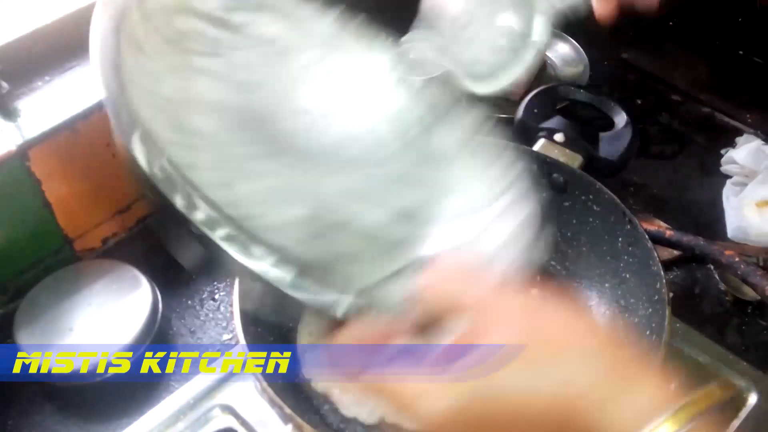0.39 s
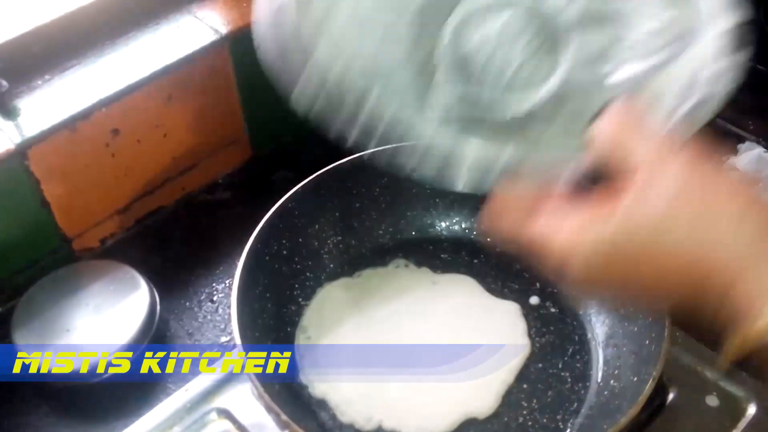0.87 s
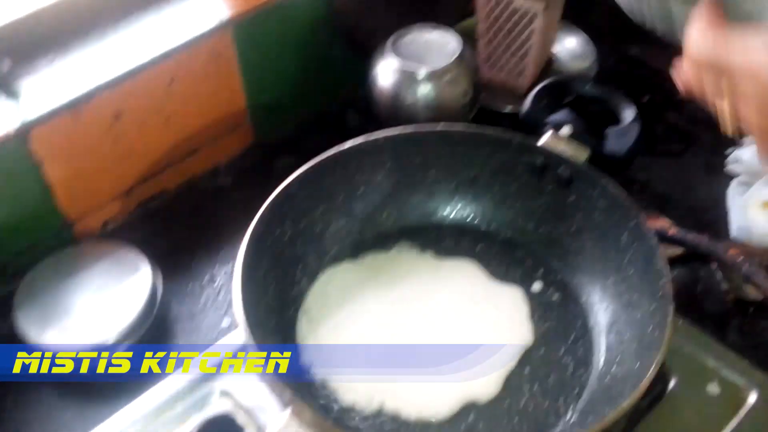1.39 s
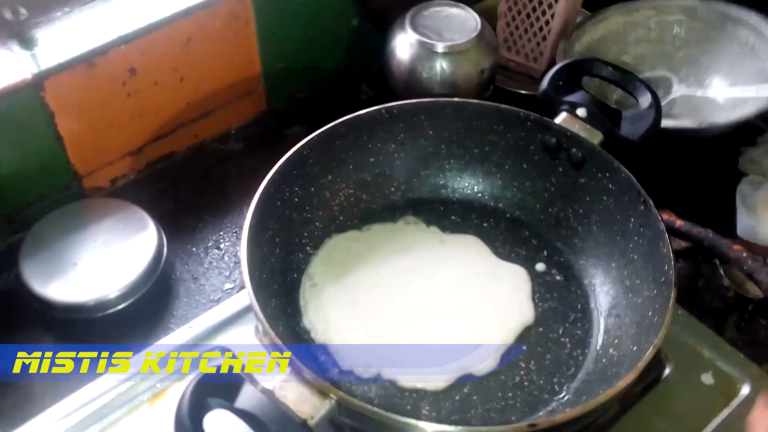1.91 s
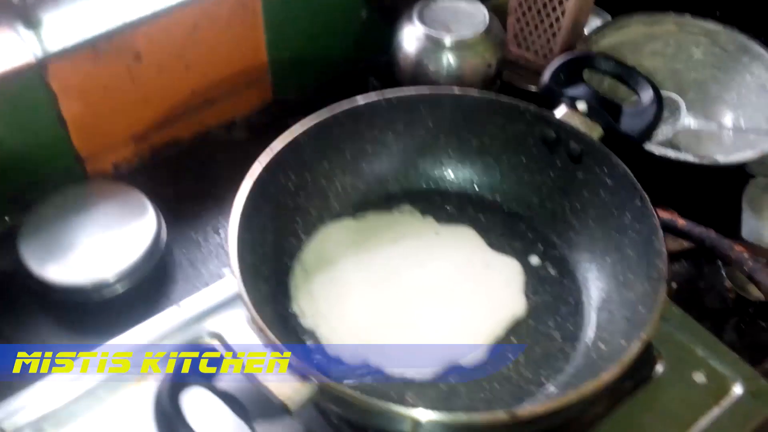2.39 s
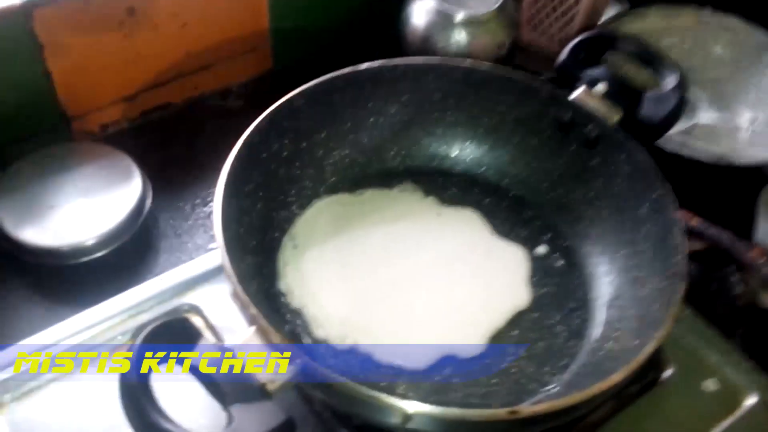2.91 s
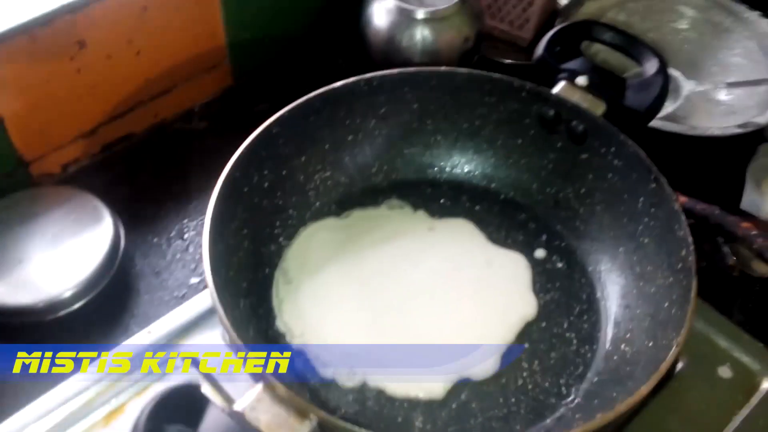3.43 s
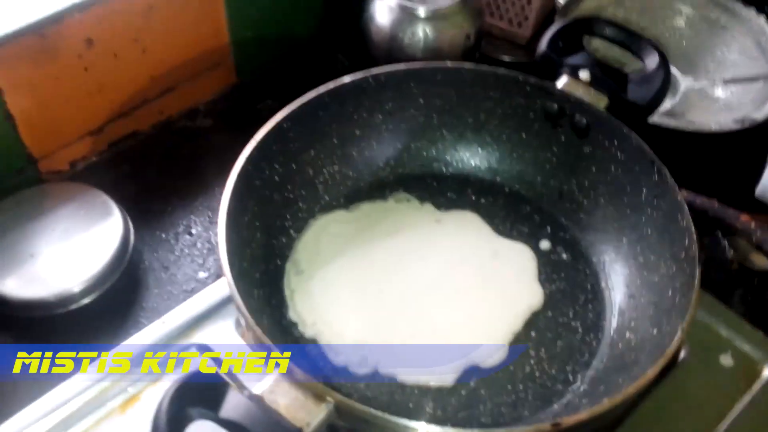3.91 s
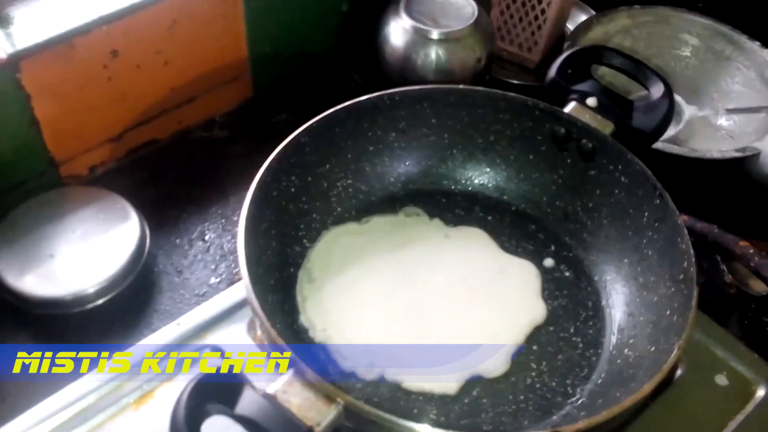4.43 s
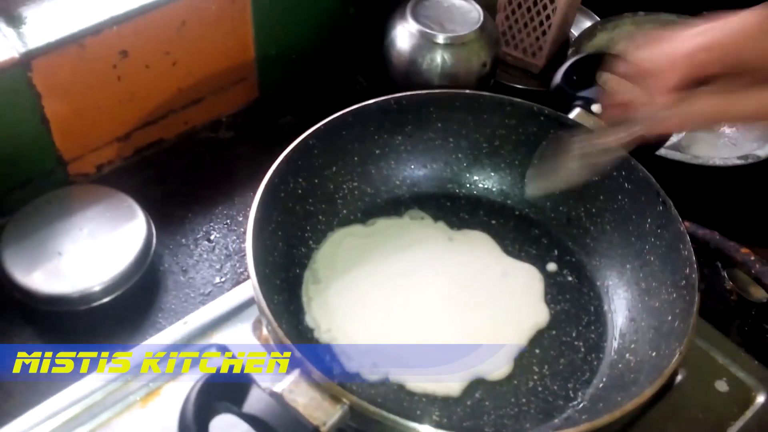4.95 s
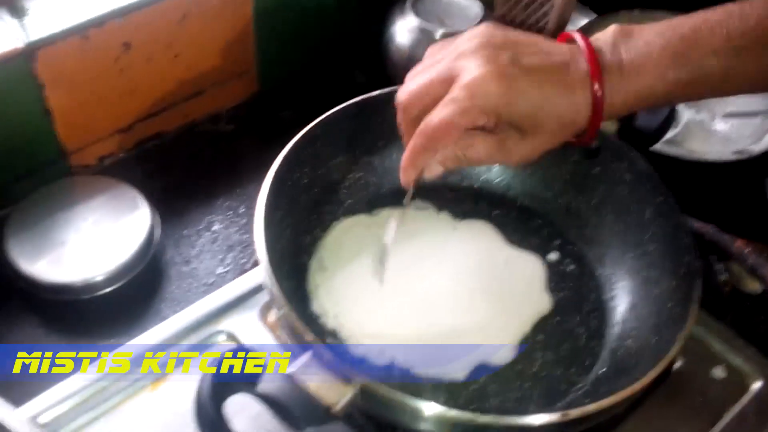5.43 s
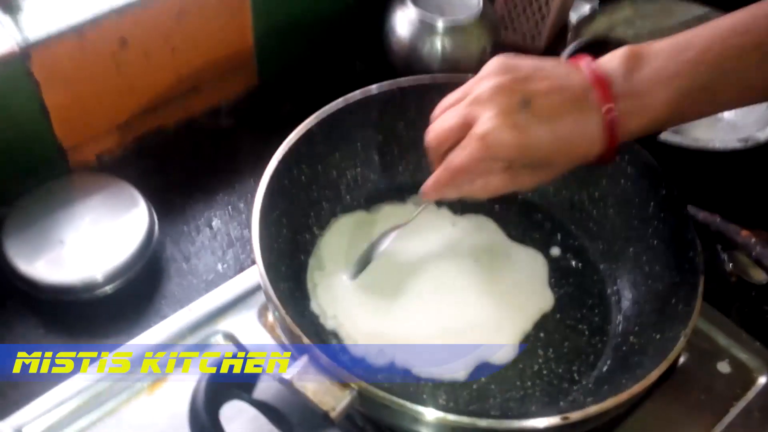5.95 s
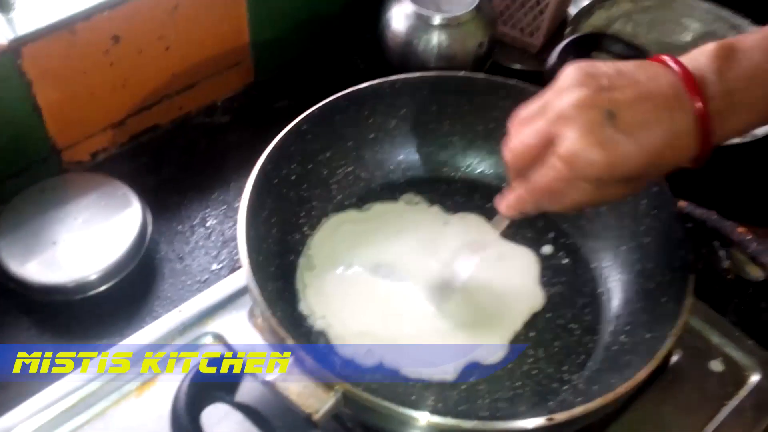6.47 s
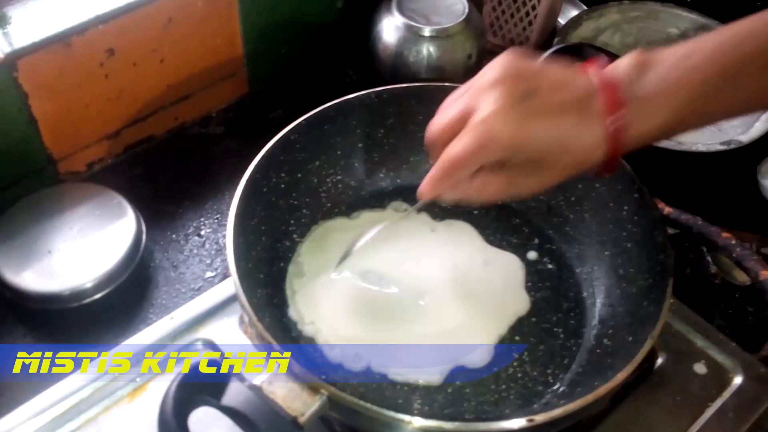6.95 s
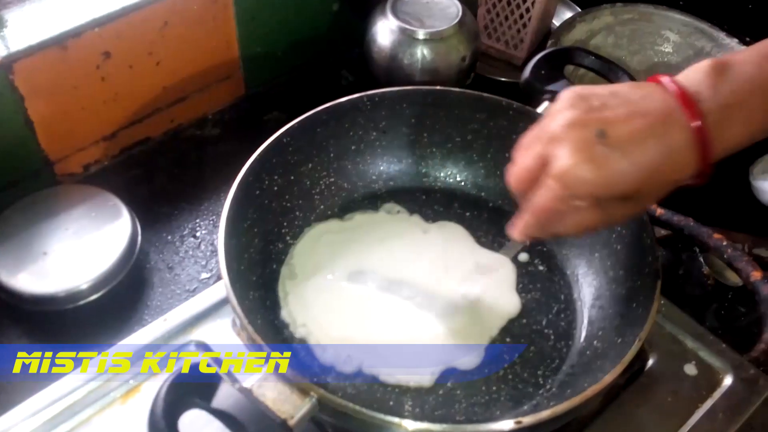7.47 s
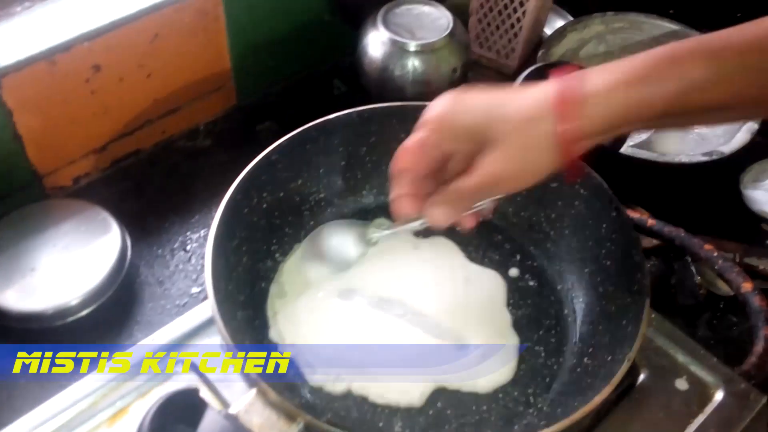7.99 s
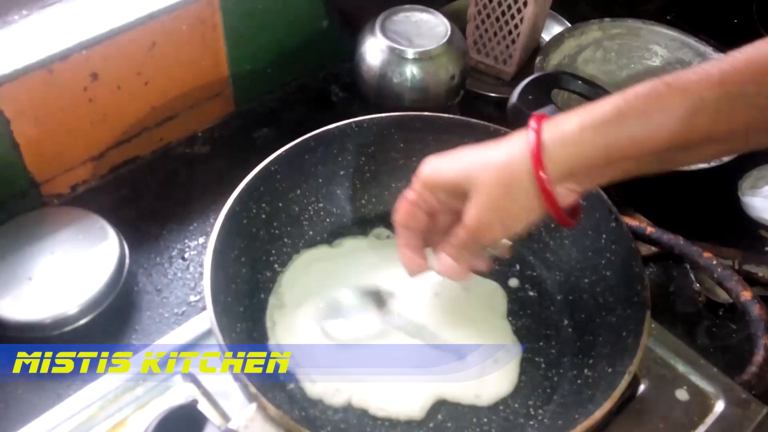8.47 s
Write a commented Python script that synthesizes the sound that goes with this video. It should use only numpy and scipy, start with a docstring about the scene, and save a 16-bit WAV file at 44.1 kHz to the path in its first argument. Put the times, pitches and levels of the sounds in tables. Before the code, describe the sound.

Batter sizzles and spits softly in an oiled pan while a steel bowl clanks onto the counter and a spoon drops with a bright clink.

```python
"""Batter in the pan, steel on the counter

Close by, batter sizzles in an oiled pan (crackling shaped noise) and spits (pitched bursts, fizz and snap).
A steel bowl is knocked, set down and rocks on the counter, and a spoon drops on steel and bounces: decaying
modes with noisy clatter. Stove top and counter rumble as resonant noise when jolted or when things slide on
them. A small tiled kitchen answers, over a low hum.
"""
import sys
import numpy as np
from scipy import signal
from scipy.fft import rfft, irfft, next_fast_len
from scipy.io import wavfile
from scipy.ndimage import uniform_filter1d, map_coordinates

SR = 44100
rng = np.random.default_rng(int(sys.argv[2]) if len(sys.argv) > 2 else 0)


def unload_audio(sound):
    """Save the sound as a 16-bit wav file, at the path given as the first command line argument."""
    columns = np.transpose(np.atleast_2d(sound))
    # keep every value between -1 and 1, then stretch to whole-number steps
    steps = np.round(np.clip(columns, -1, 1) * 32767)
    wavfile.write(sys.argv[1], SR, steps.astype(np.int16))


def invert_db(level):
    """Linear amplitude ratio for a level in decibels (20 dB per decade), elementwise."""
    return 10 ** (np.asarray(level, dtype=float) / 20)


N = 379701  # length of the scene [samples]


def unit(x):
    """Scales a signal to rms 1."""
    return x / np.sqrt(np.mean(x ** 2) + 1e-20)


def noise(size=N):
    """White noise."""
    return rng.standard_normal(size)


def along(points, hz):
    """Interpolates (frequency [Hz], value) points on a log frequency axis."""
    f, v = np.transpose(points)
    return np.interp(np.log(hz + 1), np.log(f + 1), v)


def curves(rows):
    """Gives one value per sample for each column after the time."""
    s, *cols = np.transpose(rows)
    return [np.interp(np.arange(N) / SR, s, c) for c in cols]


def wobble(rate, size=N):
    """A smooth random curve with rate knots a second."""
    knots = noise(int(size * rate / SR) + 4)
    return map_coordinates(knots, [np.arange(size) * rate / SR])


def filtered(x, response):
    """Multiplies the spectrum of x by a response of frequency."""
    m = next_fast_len(len(x) + 8192)
    return irfft(rfft(x, m) * response(np.fft.rfftfreq(m, 1 / SR)), m)[:len(x)]


def coloured(x, spectrum):
    """Shapes x by (frequency [Hz], level [dB]) points, at rms 1."""
    return unit(filtered(x, lambda hz: invert_db(along(spectrum, hz))))


def resonant(modes):
    """Noise of rms 1 sent twice through a bank of resonances of alternating sign."""
    def body(f):
        total = 0
        for k, (centre, width, db) in enumerate(modes):
            damped = 1j * f * width
            total = total + (-1) ** k * invert_db(db) * damped / (centre ** 2 - f ** 2 + damped)
        return total
    return unit(filtered(noise(), lambda f: body(f) ** 2))


def crackle(share, spread_db):
    """Dense noise with sparse clicks of very uneven size on it."""
    sizes = invert_db(spread_db * np.minimum(rng.exponential(size=N), 4))
    clicks = (rng.random(N) < share) * sizes * rng.choice([-1, 1], N)
    return noise() + clicks


def decay(t, t60):
    """An amplitude that falls 60 dB in t60 seconds."""
    return invert_db(-60 * t / t60)


def add(track, s, sound):
    """Mixes a sound into a track at a time."""
    start = round(s * SR)
    sound, start = sound[max(-start, 0):], max(start, 0)
    track[start:start + len(sound)] += sound[:len(track) - start]


def patchy(x, fine_db, broad_db):
    """Hands and pans moving nearby shift the colour: narrow slow streaks and broad quick patches."""
    z = signal.stft(x, nperseg=1024)[2]

    def field(bins, frames):
        smooth = uniform_filter1d(rng.standard_normal(z.shape), size=bins, axis=0)
        return unit(uniform_filter1d(smooth, size=frames, axis=1))

    streaks, patches = field(3, 24), field(16, 8)
    return signal.istft(z * invert_db(fine_db * streaks + broad_db * patches), nperseg=1024)[1][:N]


# low hum of the kitchen: (frequency [Hz], relative level per Hz [dB])
HUM_SPECTRUM = [(15, -46.5), (25, -11.5), (70, 0.5), (108, 1), (200, -3), (249, -1.5), (349, -6), (406, -7),
                (626, -9.5), (700, -18), (910, -39), (1540, -120)]


def hum():
    """Steady low noise whose level drifts a little."""
    return invert_db(-66 + 1.2 * wobble(5.4)) * coloured(noise(), HUM_SPECTRUM)


# the pan over time: (time [s], sizzle level [dB], fine spray level [dB], kitchen drone level [dB])
PAN_LEVELS = [(0.0, -46.5, -50.5, -50), (0.76, -49.5, -49.5, -49.5), (1.15, -48, -47, -51.5),
              (1.53, -43, -43.5, -49.5), (1.85, -49, -51, -53), (2.57, -50.5, -53.5, -52.5),
              (2.97, -50, -54, -53.5), (3.33, -51, -47, -50.5), (3.86, -44, -50, -52),
              (4.03, -53, -56.5, -55.5), (4.75, -53, -60, -58), (5.37, -52, -63.5, -57),
              (6.33, -54.5, -63.5, -60), (7.0, -55.5, -67.5, -60.5), (7.66, -53, -68, -60.5),
              (7.79, -48.5, -52, -59.5), (7.89, -50, -47, -49.5), (8.01, -53.5, -43, -49),
              (8.61, -54.5, -47, -53)]
# colours of the three layers: (frequency [Hz], relative level per Hz [dB])
SIZZLE_SPECTRUM = [(1650, -34), (2800, -16.5), (3120, -5), (3370, -4.5), (4010, -2), (4360, 0.5),
                   (4720, 1.5), (5330, 2), (6520, 3), (7050, -5), (7410, -3), (8680, -22.5), (10000, -22),
                   (10800, -37.5), (15500, -36)]
SPRAY_SPECTRUM = [(240, -49), (400, -14.5), (654, -2), (823, -10), (990, -5), (1540, -15), (2300, -4),
                  (2990, -12.5), (3540, -5), (4960, -2.5), (6150, 5.5), (14800, -27.5), (15700, -33.5)]
DRONE_SPECTRUM = [(290, -25), (500, -5), (904, -6.5), (1420, 2), (1610, -3.5), (1880, 1.5), (2050, -3.5),
                  (2820, -4), (3120, -6.5), (3300, -4.5), (4290, -11), (7260, -120)]


def pan():
    """Bubbles at the batter's edge hiss and tick; a finer, broader spray comes and goes with the heat."""
    sizzle_db, spray_db, drone_db = curves(PAN_LEVELS)
    flutter = wobble(31)  # shared by sizzle and spray
    sizzle_gain = invert_db(sizzle_db + 0.6 * flutter + 0.8 * wobble(45))
    sizzle = sizzle_gain * coloured(crackle(.006, 5.5), SIZZLE_SPECTRUM)
    spray_gain = invert_db(spray_db + 0.64 * flutter + 0.58 * wobble(5.6))
    spray = spray_gain * coloured(crackle(.004, 6), SPRAY_SPECTRUM)
    drone = invert_db(drone_db + 0.48 * wobble(4.3)) * coloured(noise(), DRONE_SPECTRUM)
    steady = patchy(sizzle + drone + hum(), fine_db=2.5, broad_db=1.72)
    return steady + patchy(spray, fine_db=2.5, broad_db=0.6)


# resonances: (centre [Hz], width [Hz], relative level of one pass [dB])
STOVE_MODES = [(103.4, 52, -1), (134.9, 17, 2)]
COUNTER_MODES = [(173, 23, -5), (250.2, 40.7, -1), (321, 199, -5.5), (461, 100, -7.5)]
# jolts: (time [s], t60 [s], stove boom level [dB], counter level [dB], wash of the mids level [dB])
JOLT_EVENTS = [(0.716, 0.16, -34, -44, -60), (0.765, 0.65, -66, -45.5, -59), (1.1, 0.29, -80, -45.5, -58),
               (2.06, 0.72, -39.5, -55, -32), (2.245, 0.53, -37, -33.5, -23), (2.33, 0.98, -37, -42.5, -60),
               (2.5, 0.39, -47, -57, -60), (3.059, .5, -52, -46.5, -64), (3.65, 0.71, -79, -53.5, -46),
               (5.964, 0.52, -52.5, -50.5, -54.5)]
# things dragged: (middle [s], length between the -22 dB points [s], stove boom level [dB], counter level [dB])
DRAG_EVENTS = [(0.113, 0.39, -70, -58), (0.582, 0.17, -66, -73), (1.013, .06, -64, -63),
               (1.525, 0.12, -63, -41.5), (1.558, 0.52, -56, -44.5), (3.272, 0.11, -53, -59),
               (3.426, 0.34, -67, -56), (4.02, 0.092, -62, -65), (4.896, 0.073, -74, -64.5),
               (6.145, .25, -55, -79.5), (6.658, 0.27, -57, -64), (6.91, .1, -61.5, -78),
               (8.02, 0.24, -57, -70), (8.22, .1, -67, -80)]


def slide():
    """Jolts shake stove and counter at once and die away; drags swell and fade; both idle faintly between."""
    idle_db = -75.5 + 3 * wobble(10)
    shake = np.vstack([invert_db(idle_db), invert_db(idle_db), np.zeros(N)])  # boom, counter, wash
    after = np.arange(SR) / SR
    for s, t60, *dbs in JOLT_EVENTS:
        shape = decay(after, t60) * (1 - np.exp(-after / 0.012))
        for layer, db in zip(shake, dbs):
            add(layer, s, invert_db(db) * shape)
    for s, length, *dbs in DRAG_EVENTS:
        place = np.linspace(-2, 2, round(2 * length * SR))  # 0 in the middle, -1 and 1 at the -22 dB points, -2 and 2 at the ends
        shape = invert_db(-22 * place ** 2)
        for layer, db in zip(shake, dbs):
            add(layer, s - length, invert_db(db) * shape)
    boom, counter, wash = shake
    stove_sound = boom * resonant(STOVE_MODES)
    counter_sound = counter * invert_db(1.3 * wobble(36)) * resonant(COUNTER_MODES)
    return stove_sound + counter_sound + wash * coloured(noise(), DRONE_SPECTRUM)


def small_spits():
    """Rows like LOUD_SPITS for 20 small spits at random times, their level following the sizzle."""
    when, size, pitch, snap = rng.random((20, 4)).T
    s = when * (N / SR - .1)
    sizzle_db = np.interp(s, *np.transpose(PAN_LEVELS)[:2])
    level_db = sizzle_db + 18.5 + 6 * (size - .5)
    hz = 5900 * (1 + .25 * (pitch - .5))
    fizz_db = np.full(len(s), -18.5)
    snap_db = -27 + 16 * (snap - .5)
    return zip(s, level_db, hz, fizz_db, snap_db)


# loud spits of oil: (time [s], level [dB], pitch [Hz], fizz level [dB], snap level [dB]);
# fizz and snap are relative to the spit's level
LOUD_SPITS = [(0.063, -25, 5700, -9, -14), (0.1084, -34, 6370, -17, -4), (0.2223, -18, 6550, -10, -9),
              (0.4651, -21.5, 5470, -11.5, -22), (1.559, -24, 5000, -22, -27),
              (1.8862, -25.5, 6380, -20, -18.5), (2.9073, -27.5, 6270, -17.5, -13),
              (3.003, -28.5, 6400, -12, -22), (3.2121, -21.5, 6360, -17, -20),
              (4.0135, -30, 6270, -9.5, -15), (4.273, -31, 6100, -3.5, -40.5),
              (4.451, -36.5, 6300, -17, -11), (4.4636, -21, 6230, -23.5, -27),
              (4.6118, -27, 6550, -16.5, -11.5), (4.895, -31, 6060, -15, -15),
              (4.919, -29.5, 6180, -16.5, -25), (4.9427, -28, 5940, -13, -25.5),
              (4.9534, -32, 6400, -7, -31), (4.9674, -28, 5300, -17, -23), (5.0964, -19, 6100, -24, -38),
              (5.1497, -29, 6300, -11.5, -38.5), (5.224, -28, 5450, -16, -33.5),
              (5.6226, -30, 5550, -11.5, -27.5), (5.911, -25.5, 6450, -13.5, -5),
              (5.9675, -13.5, 6070, -19, -25), (6.6454, -31.5, 6240, -11, -33),
              (7.2982, -28, 6000, -19, -34), (7.3765, -33, 4720, -16, -26),
              (7.6224, -29.5, 6230, -14, -31.5), (7.7155, -17, 6100, -24, -27),
              (8.4194, -21.5, 6740, -15, -18)]
# colour of the snap: (frequency [Hz], relative level per Hz [dB])
SNAP_SPECTRUM = [(2000, -30.5), (4000, -8), (8000, 4.5), (11000, -3.5), (14500, -20.5), (16000, -16)]


def spits():
    """Each spit is a few cycles at the bubble's pitch, a short fizz and a bright snap."""
    out, t = np.zeros(N), np.arange(SR // 20) / SR
    for s, db, hz, fizz_db, snap_db in [*LOUD_SPITS, *small_spits()]:
        burst = np.exp(-((t - .0008) / 0.0003) ** 2) * np.sin(2 * np.pi * hz * t)
        fizz_shape = decay(t, 0.032) * (1 - np.exp(-(t / 0.0004) ** 2))
        fizz = invert_db(fizz_db) * fizz_shape * coloured(noise(len(t)), SIZZLE_SPECTRUM)
        snap_shape = decay(t, 0.004) + invert_db(-12) * decay(t, 0.068)
        snap = invert_db(snap_db) * snap_shape * coloured(noise(len(t)), SNAP_SPECTRUM)
        add(out, s - .0006, invert_db(db) * (burst + fizz + snap))
    return out


# bowl modes: (frequency [Hz], t60 [s], level struck on the base [dB], on the wall [dB], on the rim [dB],
# by the spoon inside [dB])
BOWL_MODES = [(248.3, 0.46, -31.5, -24, -10, -19), (328, 0.55, -28, -35, -7, -33),
              (431, 0.67, -5.5, -33, -8.5, -21), (566, 0.523, -14, -20, -2, -23),
              (647, 0.55, -10, -40, -10.5, -16), (730, 0.18, -11, -38, -46, -34),
              (1014, 0.61, -4.5, -13.5, -32, -16), (1169, 0.5, -27, -0.5, -11, -24),
              (1180, 0.51, -16, -24, -26, -22), (1315, 0.52, 4.5, -16, -30, -34),
              (1540, 0.52, -14, -19, -5, -11), (1743, .35, -17, -38, -4.5, -10),
              (1826, 0.23, -11, -40, -10, -27), (2020, 0.46, -20, -23, -2.5, -18),
              (2370, .3, -21.5, -32, -27, -39), (2567, 0.93, -32.5, -11.5, -13.5, -17),
              (2870, 0.56, -27.5, -39, -19, -29), (2810, .3, -47.5, -36, -25, -13),
              (3220, 0.19, -45.5, -20, -30, -8.5), (3570, 0.1464, -46.5, -24, -6.5, -27),
              (3730, .15, -39, -33.5, -22.5, -6), (4040, 0.13, -46, -14, -23, -10),
              (4340, 0.54, -49, -24.5, -14, -16), (5313, 0.27, -46, -47, -17, -13),
              (5800, 0.23, -52, -23, -18.5, -21), (6100, 0.12, -56, -18, -3, -19),
              (6630, 0.31, -50.5, -26, -8, -34)]
# contacts: (time [s], ring level [dB], spot (rounded: 0 base, 1 wall, 2 rim, 3 inside), thud level [dB],
# clatter level [dB], damping of earlier ringing [dB per kHz])
BOWL_KNOCKS = [(0.7152, -13, 0, -4.5, -21.5, 0), (0.7631, -30, 0, -8, -20, 1.5),
               (0.798, -36.5, 2, -22, -41, 7), (0.83, -56, 2, -33.5, -40.5, 17),
               (1.104, -46, 0.5, -25.5, -32.5, 4), (2.046, -14, 1, -27.5, -19.5, 0),
               (2.116, -25.5, 3, -42, -35, 4), (2.241, -17, 2, -14.5, -16, 7),
               (2.286, -23.5, 2, -29, -24.5, 14), (2.33, -23.5, 3, -21.5, -32, 8),
               (2.352, -41, 2, -27, -33.5, 1.5), (2.497, -43.5, 3, -49, -37.5, 16)]
# dense ringing at base, wall and rim: (frequency [Hz], relative level per Hz [dB])
CLATTER_SPECTRA = [
    [(47, -54.5), (80, -21.5), (352, -13.5), (438, -0.5), (483, -13), (544, 4), (1320, -12), (2920, -29.5),
     (6560, -27), (9000, -36), (11700, -63.5), (19800, -120)],
    [(47, -51), (80, -27.5), (923, -20.5), (1200, -5), (1470, -16.5), (2430, -18), (2600, -30), (2970, -39),
     (3240, -25.5), (6420, -26), (15500, -55.5)],
    [(47, -29.5), (78, -20.5), (100, 0.5), (173, -30.5), (246, 0.5), (487, -10), (569, -3), (965, -7),
     (1790, -4.5), (3100, -24.5), (6560, -11), (15500, -63)],
]
# decay of the clatter at each of the four spots: t60 [s]
CLATTER_DECAYS = [0.27, 0.41, 0.33, 0.19]
# time constant of the ring's onset at each of the four spots: [s]
RING_ONSETS = [0.027, 0.0014, 0.0047, 0.0027]


def bowl():
    """The struck spot sets how strongly each mode rings; each new contact damps what was ringing."""
    out, t = np.zeros(N), np.arange(SR // 2) / SR
    hz, t60, *spots = np.transpose(BOWL_MODES)[:, :, None]
    times, damping_db = np.transpose(BOWL_KNOCKS)[[0, -1], :, None]
    for s, ring_db, spot, thud_db, clatter_db, _ in BOWL_KNOCKS:
        spot = round(spot)
        phase = 2 * np.pi * rng.random(hz.shape)
        contact = np.clip((s + t - times) / 0.0033, 0, 1)  # later contacts take hold within 3.3 ms
        lost_db = ((times > s) * damping_db * contact).sum(axis=0)
        level_db = spots[spot] - 60 * t / t60 - lost_db * hz / 1000  # high modes lose most
        ring = (invert_db(level_db) * np.sin(2 * np.pi * hz * t + phase)).sum(axis=0)
        ring *= 1 - np.exp(-t / RING_ONSETS[spot])
        # the counter under the bowl
        thud = np.exp(-((t - .0026) / 0.0021) ** 2) * np.sin(2 * np.pi * 740 * t)
        rattle = invert_db(2.1 * wobble(300, size=len(t)))
        clatter = coloured(noise(len(t)), CLATTER_SPECTRA[min(spot, 2)])  # inside shares the rim's colour
        clatter *= rattle * decay(t, CLATTER_DECAYS[spot]) * (1 - np.exp(-(t / 0.000408) ** 2))
        add(out, s, invert_db(ring_db) * ring + invert_db(thud_db) * thud + invert_db(clatter_db) * clatter)
    return out


# spoon modes: (frequency [Hz], relative level [dB], t60 [s])
SPOON_MODES = [(1026, -2.5, 0.081), (1700, -2, 0.32), (1930, -41, 1.9), (2848, -15.5, 0.49),
               (3530, -25, 0.19), (3560, -4, 0.093), (3723, 0.5, 0.088), (4377, -8, 0.28),
               (4990, -8.5, 0.36), (5570, 12.5, 0.041), (6142, 1.5, 0.11), (6700, 0, 0.093),
               (6430, -5, 0.12), (7340, -7, 0.21), (7530, -4, 0.11), (7450, -18, 0.35), (7700, -14.5, 0.32),
               (8300, -10, 0.17), (9600, -14.5, 0.14), (10920, -35, 0.16)]
# contacts: (time [s], ring level [dB], jangle level [dB], favoured pitch [Hz], fall-off [dB per octave])
SPOON_DROPS = [(3.228, -41, -26, 2300, 5.5), (3.641, -23, -13, 5800, 3), (3.643, -22, -9, 5800, 4),
               (3.648, -32.5, -19.5, 3710, -3), (3.669, -31, -19.5, 2880, 3), (3.781, -32.5, -40, 6150, 70),
               (3.802, -37, -24, 4630, -1), (3.838, -31.5, -43, 5900, 77)]
# colour of the jangle before the favoured pitch: (frequency [Hz], relative level per Hz [dB])
JANGLE_SPECTRUM = [(120, -58), (200, -30.5), (910, -12.5), (1020, -33), (1200, -28), (1690, 1), (2480, -45),
                   (2770, -6), (3710, -20.5), (4070, -14.5), (6300, -6.5), (15700, -36)]


def spoon():
    """Every bounce rings the spoon, weighting its modes about the pitch that the contact point favours."""
    out, t = np.zeros(N), np.arange(SR // 2) / SR
    hz, db, t60 = np.transpose(SPOON_MODES)[:, :, None]
    for s, ring_db, jangle_db, near_hz, focus_db in SPOON_DROPS:
        def weight_db(f):
            return -focus_db * np.abs(np.log2((f + 1) / near_hz))

        # split mode pairs beat
        beat_hz = hz * rng.uniform(.008, .02, hz.shape)
        beats = 1 + .6 * np.sin(2 * np.pi * (beat_hz * t + rng.random(hz.shape)))
        tones = np.sin(2 * np.pi * (hz * t + rng.random(hz.shape)))
        ring = (invert_db(db + weight_db(hz)) * decay(t, t60) * beats * tones).sum(axis=0)
        ring *= 1 - np.exp(-t / 0.0015)
        jangle = filtered(coloured(noise(len(t)), JANGLE_SPECTRUM), lambda f: invert_db(weight_db(f)))
        jangle *= (decay(t, .02) + invert_db(-13) * decay(t, .25)) * (1 - np.exp(-(t / .0003) ** 2))
        add(out, s, invert_db(ring_db) * ring + invert_db(jangle_db) * jangle)
    return out


# small dull ticks of steel: (time [s], level before halving [dB], pitch [Hz])
STEEL_TICKS = [(4.329, -38, 4370), (4.737, -37.5, 1210), (5.302, -35, 2845), (3.229, -33.5, 3000),
               (6.933, -37.5, 2080), (6.992, -35, 4360)]


def ticks():
    """Each tick is a softly started, quickly dying burst of noise around one pitch."""
    out, t = np.zeros(N), np.arange(SR // 20) / SR
    shape = decay(t, .025) * (1 - np.exp(-(t / .001) ** 2)) / 2
    for s, db, hz in STEEL_TICKS:
        tick = coloured(noise(len(t)), [(hz / 2, -20), (hz, 0), (hz * 2, -40)])
        add(out, s, invert_db(db) * tick * shape)
    return out


# answer of the tiles: (frequency [Hz], t60 [s])
TILE_DECAYS = [(100, 0.45), (500, 0.77), (2000, 0.46), (6000, 0.31), (14000, 0.32)]


def kitchen(x):
    """Noise whose frequencies each die at their own speed stands for the echoes of the tiles."""
    hz, t, z = signal.stft(noise(SR), SR, nperseg=256)
    tail = signal.istft(z * decay(t, along(TILE_DECAYS, hz)[:, None]), SR, nperseg=256)[1]
    late = np.pad(x, (150, 0))  # the answer starts 150 samples later
    return signal.fftconvolve(late, tail / np.linalg.norm(tail))[:N]


def scene():
    """Steel and spits ring in the kitchen over the steady pan; they carry no deep bass."""
    pops, steel, tool = spits() + ticks(), bowl(), spoon()
    blur = unit(wobble(50))  # a random slow modulation blurs the pitches in the bowl's echo
    wet = invert_db(-8.5) * kitchen(pops) + invert_db(-13) * kitchen(steel * blur) + invert_db(-5) * kitchen(tool)
    struck = pops + steel + tool + wet + slide()
    near = filtered(struck, lambda hz: 1 / (1 + (72 / (hz + 1)) ** 4))
    return (near + pan())[None]


def top_cut(x):
    """Nothing passes above the cut-off."""
    return signal.sosfilt(signal.butter(12, 15650, fs=SR, output="sos"), x)


def record(dry):
    """The sound ends steeply at the top, around 15.7 kHz."""
    mix = filtered(dry[0], lambda hz: 1 / (1 + (hz / 15700) ** 40))
    return top_cut(mix[None])


dry = scene()
out = record(dry)
unload_audio(out)
```